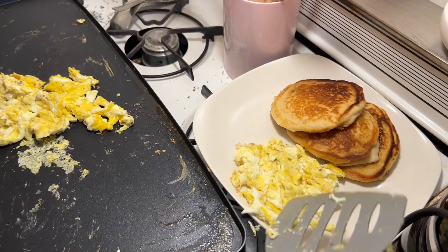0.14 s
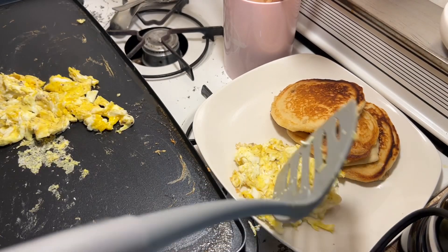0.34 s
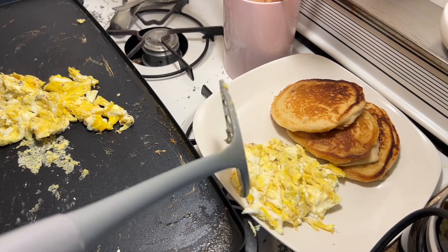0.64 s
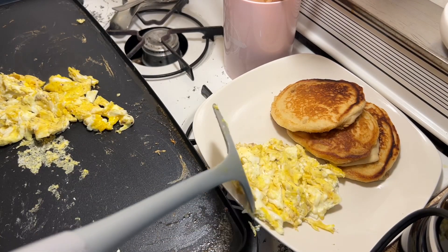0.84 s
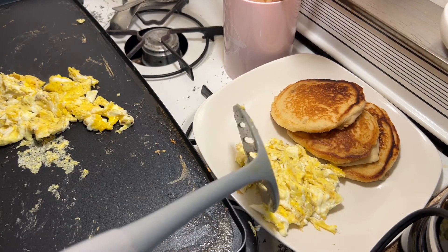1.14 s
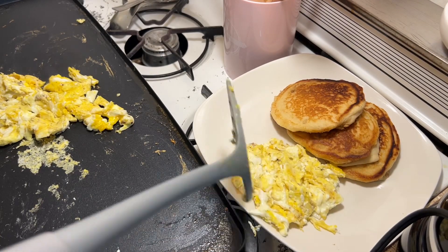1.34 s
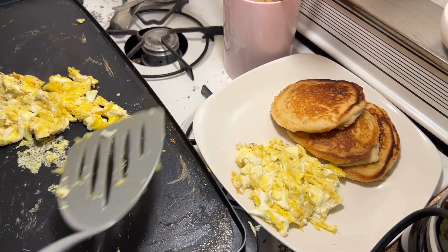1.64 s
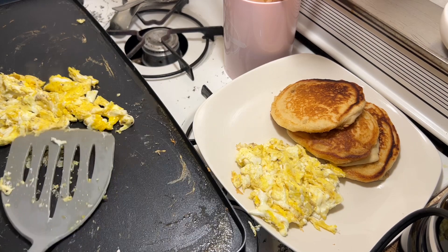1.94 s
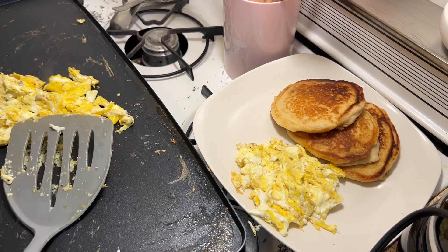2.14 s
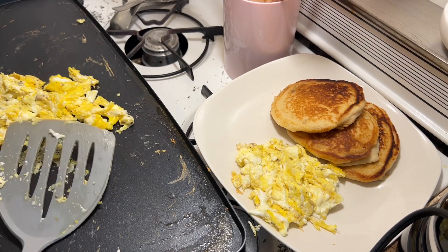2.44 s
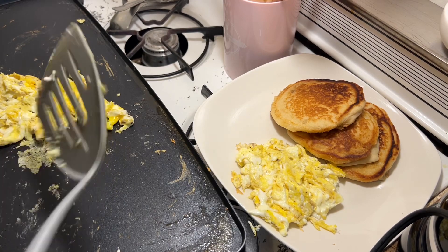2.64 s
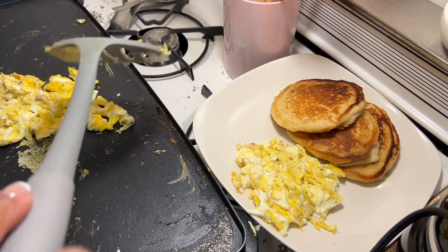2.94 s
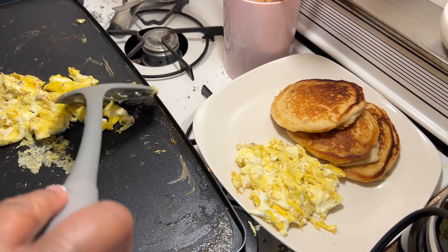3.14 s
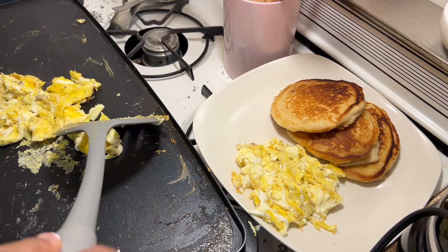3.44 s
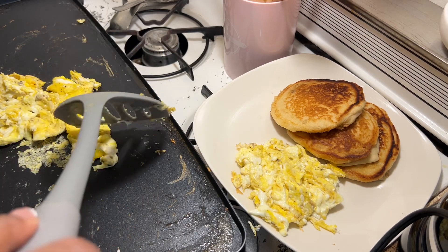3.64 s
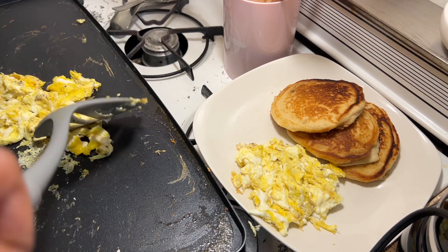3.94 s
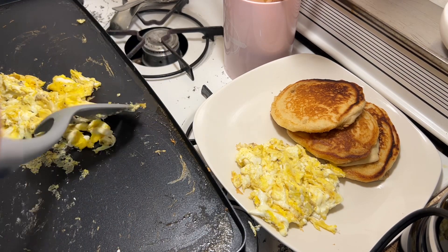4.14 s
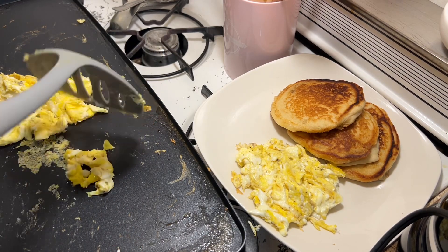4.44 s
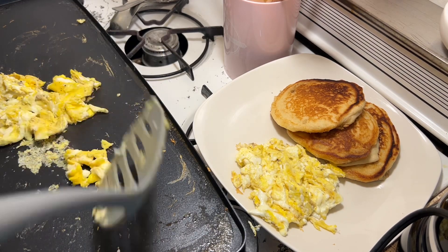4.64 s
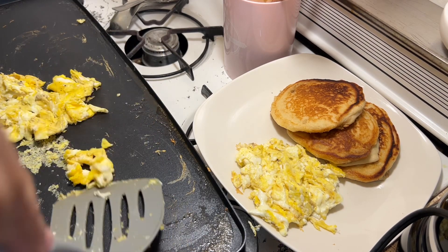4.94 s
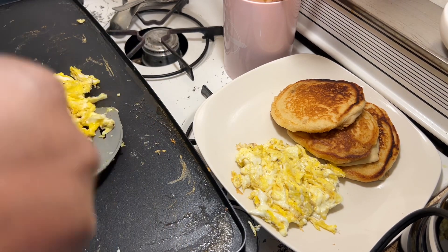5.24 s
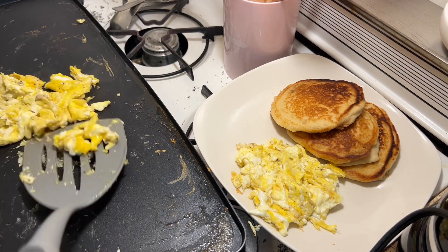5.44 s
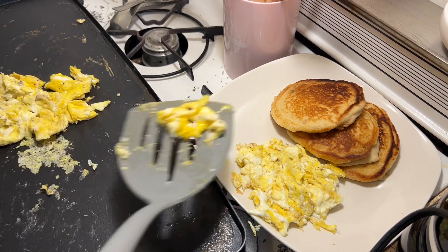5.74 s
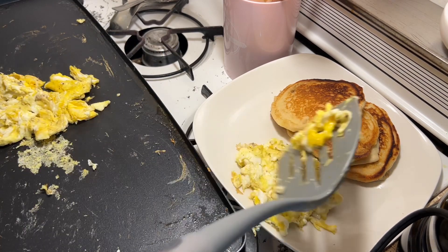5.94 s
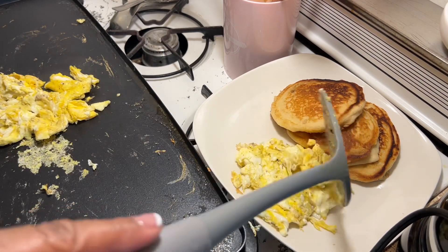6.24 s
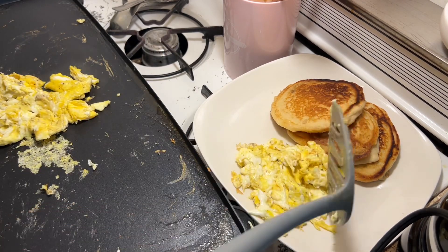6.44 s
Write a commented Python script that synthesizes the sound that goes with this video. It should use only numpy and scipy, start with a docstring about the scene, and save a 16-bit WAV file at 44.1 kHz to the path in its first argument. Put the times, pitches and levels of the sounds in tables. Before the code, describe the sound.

A plastic spatula knocks sharply on a griddle rim, taps a plate softly, then scrapes and hisses over the metal, with low hum beneath.

```python
"""In a small kitchen, close to the stove, a stereo pair of microphones hears a plastic spatula at a griddle.
It knocks the rim, slides and scrapes over the metal to gather scrambled egg, and taps it onto a plate.
Blows ring the modes of griddle and plate; slips of the blade shake the same slab and hiss over its coating.
The blade clicks, rasps on crust, whirrs as it flexes, groans when pressed and whistles on its upright edge.
A short tail from cupboards and walls follows, over a low appliance hum and faint room noise."""
import sys
import numpy as np
from scipy import signal
from scipy.fft import rfft, irfft
from scipy.io import wavfile

SR = 44100
rng = np.random.default_rng(int(sys.argv[2]) if len(sys.argv) > 2 else 0)


def dump(signal):
    """Clip the signal to [-1, 1] and save it as 16-bit WAV at the path in sys.argv[1]."""
    limited = np.clip(np.atleast_2d(signal).T, -1, 1)
    pcm = np.round(limited * 32767).astype(np.int16)
    wavfile.write(sys.argv[1], SR, pcm)


N = 290178
TIME = np.arange(N) / SR
RING_TIME = TIME[:SR // 2]


# blows and rebounds on the griddle: start_s, ring_db, click_db, contact_cutoff_hz, rim (0 flat - 1 rim)
GRIDDLE_BLOWS = [(0.0731, -14, -8, 5200, 1), (0.078, -44, -20, 4800, 1), (1.9084, -61, -19.5, 13100, 0),
                 (2.138, -60, -26, 9000, 0.079), (4.7833, -34, -20.5, 3180, 0), (4.892, -46, -37, 1200, 0),
                 (4.92, -41.5, -33, 1200, 0.16), (5.038, -56, -25, 1500, 0.1), (5.063, -58, -29, 2200, 0.1),
                 (5.145, -53, -35, 1400, 0.17)]


def griddle_taps():
    """Each blow clicks the blade and rings the slab; a softer contact excites less treble."""
    clicks, rings = np.zeros((2, 2, N))
    for start_s, ring_db, click_db, cutoff_hz, rim in GRIDDLE_BLOWS:
        add(rings, start_s, undb(ring_db) * butter(griddle_ring(rim), cutoff_hz, "low"))
        add(clicks, start_s, click(click_db, cutoff_hz))
    return clicks, rings


# vibration modes of the griddle slab: pitch_hz, t60_s, rim_level_db (struck there), flat_level_db (touched)
GRIDDLE_MODES = [(183.5, 0.16, -23.5, -11), (366, 0.21, -41, -13), (523, 0.17, -17, -16),
                 (568, 0.21, -21.5, -35), (630, 0.15, -17, -11), (675, 0.17, -23, -19.5),
                 (754, 0.12, -26, -23), (798.4, 0.13, -1, 3), (835, 0.16, -13, -21), (903, 0.1, -11.5, -12),
                 (961, 0.14, -26, -9.5), (1020, 0.11, -18, -14.5), (1150, 0.085, -7, -13),
                 (1186, 0.08, -8, -11), (1256, 0.09, -17, -11), (1333, 0.069, -19, -28),
                 (1357, 0.13, -25, -36), (1450, 0.17, -29, -31), (1514, 0.12, -25, -14),
                 (1570, 0.084, -24, -5.5), (1680, 0.076, -14, -7), (1820, 0.089, -18, -8),
                 (1895, 0.12, -25, -19), (1930, 0.081, -21, -9), (2070, 0.11, -33, -15),
                 (2267, 0.076, -19, -9.5), (2375, 0.076, -23, -7.5), (2590, 0.13, -31, -22),
                 (2838, 0.047, -18, -4.5), (2934, 0.13, -30, -22), (3236, 0.1, -21, -17),
                 (3550, 0.11, -36, -22), (3640, 0.13, -29, -21), (3800, 0.027, -3.5, -24),
                 (3970, 0.12, -35, -21), (4020, 0.021, 0, -26), (4460, 0.09, -27, -11),
                 (4600, 0.17, -35, -19), (5243, 0.08, -28, -23)]
# spectrum of the slab's crowded weak modes: pitch_hz, level_db
WASH_SPECTRUM = [(300, -16), (550, -4), (1000, 5), (2000, 2), (4200, -3), (5200, 3), (6500, -28),
                 (12000, -38)]


def griddle_ring(rim, wash_db=-18, wash_t60=0.15):
    """The slab's answer to a blow: clear modes in a wash of crowded weak ones."""
    crowd = unit(colour(stereo_noise(len(RING_TIME)), WASH_SPECTRUM))
    wash = undb(wash_db) * crowd * fade(wash_t60)
    return wash + struck(GRIDDLE_MODES, rim)


# strokes of the edge over the coating: start_s, length_s, hiss_db, top_treble_lift_db,
# crust_rasp_db, blade_whirr_db
SLIDE_STROKES = [(1.908, 0.053, -56, 4, -55.5, -54.5), (2.002, 0.048, -59.5, -8, -66, -65),
                 (2.015, 0.014, -68, -8, -55, -62), (3.201, 0.12, -58.5, 5.5, -71.5, -80),
                 (3.298, 0.094, -51, 2, -64, -79), (3.387, 0.12, -49, 3.5, -71, -71),
                 (3.513, 0.11, -56, 5, -70.5, -74), (3.777, 0.019, -63.5, 8, -87, -88),
                 (3.894, 0.063, -51.5, 6, -64, -65), (3.947, 0.049, -47, 7.5, -53.5, -54),
                 (3.976, 0.015, -60, 6, -55, -66), (4.016, 0.082, -53.5, 8.5, -74, -62.5),
                 (4.092, 0.17, -57.5, 8.5, -76, -85), (4.263, 0.13, -55, 7, -75, -65),
                 (4.851, 0.11, -60.5, 4.5, -62.5, -69), (4.963, 0.21, -58.5, 8, -78, -78),
                 (5.142, 0.15, -59.5, 5, -71, -79), (5.33, 0.078, -65, 2, -75, -80)]
# shape of a slide: attack_s, sag_db_per_s, release_t60_s
SLIDE_COURSE = (0.029, -10.5, 0.21)
# spectrum of the hiss of the edge: pitch_hz, level_db
EDGE_SPECTRUM = [(500, -38), (1200, -11), (1750, -4.5), (2400, -6.5), (3100, -3), (3800, 0), (4700, 3),
                 (5400, 2), (6000, 4), (7000, 3), (7700, 4), (8700, 3.5), (10000, -2), (12000, -12.5),
                 (15500, -9.5)]


def edge_hiss(edge_db=1, flutter_db=0.4):
    """The pebbled coating hisses under the blade's edge, brighter when the blade stands upright."""
    fine = slips(rate=3000, scatter_db=3.5)
    bursts = grains(fine * undb(flutter_db * walk(45)), t60=0.039)
    hiss = undb(edge_db) * unit(patchy(colour(bursts, EDGE_SPECTRUM)))
    sheen = colour(hiss, [(6000, -49), (8500, -10.5), (12000, 5.5), (15500, 6)])
    levels = [(start_s, length_s, db, db + lift_db)
              for start_s, length_s, db, lift_db, *_ in SLIDE_STROKES]
    gain, top_gain = gains(levels, SLIDE_COURSE)
    return gain * hiss + (top_gain - gain) * sheen


def patchy(x, depth_db=2.0, rate=90):
    """Each part of the edge catches on its own, so neighbouring bands flicker separately."""
    bins, spectrum = np.fft.rfftfreq(N, 1 / SR), rfft(x)
    centres_hz = np.geomspace(1000, 16000, 13)
    out = 0
    for band in np.eye(len(centres_hz)):
        part = irfft(spectrum * np.interp(bins, centres_hz, band), N)
        out = out + part * undb(depth_db * walk(rate))
    return out


# shoves of the flat blade under the egg: start_s, length_s, dull_rub_db, slab_judder_db,
# crust_rasp_db, blade_whirr_db
SHOVE_STROKES = [(1.925, 0.13, -53, -50, -67, -70), (2.02, 0.066, -51, -52, -63, -60.5),
                 (2.095, 0.069, -52, -61, -79, -83), (2.232, 0.073, -58, -60.5, -78, -76),
                 (2.37, 0.058, -65, -74, -83, -84), (2.42, 0.052, -50.5, -55, -67, -60),
                 (2.485, 0.056, -51, -58, -70, -82), (4.075, 0.098, -53, -60.5, -61.5, -66),
                 (4.255, 0.13, -57, -60, -60, -62), (4.88, 0.066, -61, -48.5, -67, -62),
                 (4.988, 0.023, -62, -50, -78, -55), (5.028, 0.04, -50, -65, -57.5, -64),
                 (5.112, 0.036, -60, -60, -72, -84), (5.18, 0.082, -66, -61, -72, -80)]
# shape of a shove: attack_s, sag_db_per_s, release_t60_s
SHOVE_COURSE = (0.029, -30, 0.094)
# spectrum of the dull rub: pitch_hz, level_db
RUB_SPECTRUM = [(200, -23), (320, 1), (395, 0), (480, -6), (560, -2), (655, 2), (800, -4), (900, -14.5),
                (1100, -8), (1240, -5.5), (1400, -24), (3000, -31)]
# spectrum of the dried crust: pitch_hz, level_db
CRUST_SPECTRUM = [(600, -33), (1200, 9.5), (1700, 7), (2100, 7.5), (2400, -22), (2900, 4), (7000, -37)]


def scrapes(rub_db=-2.0, judder_db=1.0, crust_db=1.0, whirr_db=0.0):
    """Coarse stick-slip thuds in the blade and shakes the slab; dried crust rasps and sets off the whirr."""
    coarse = slips(rate=1500, scatter_db=3.0)
    rub = undb(rub_db) * unit(colour(grains(coarse, t60=0.06), RUB_SPECTRUM))
    judder = undb(judder_db) * slab(butter(coarse, 1100, "low"))
    crumbs = grains(slips(rate=870, scatter_db=2.5), t60=0.0098)
    rasp = undb(crust_db) * unit(colour(crumbs, CRUST_SPECTRUM))
    bend = undb(whirr_db) * whirr(butter(crumbs, 1550, "high"))

    rub_gain, judder_gain, flat_rasp, flat_whirr = gains(SHOVE_STROKES, SHOVE_COURSE)
    edge_levels = [(start_s, length_s, *levels) for start_s, length_s, _, _, *levels in SLIDE_STROKES]
    edge_rasp, edge_whirr = gains(edge_levels, SLIDE_COURSE)
    rasp_gain = np.hypot(flat_rasp, edge_rasp)
    whirr_gain = np.hypot(flat_whirr, edge_whirr)
    return rub_gain * rub + judder_gain * judder + rasp_gain * rasp + whirr_gain * bend


def slab(releases, shift_db=3.5, rate=22):
    """The griddle rung by a travelling contact: each mode swells and fades as the blade crosses its nodes."""
    out = 0
    for hz, t60, _, flat_db in GRIDDLE_MODES:
        pole = np.exp((2j * np.pi * hz - np.log(1000) / t60) / SR)
        push = releases * undb(flat_db + shift_db * walk(rate))
        out = out + signal.lfilter([1], [1, -pole], push).imag
    return unit(out)


# pitch of the blade's lower bending resonance as it flexes: time_s, pitch_hz
WHIRR_PITCH = [(1.98, 2280), (2.07, 2300), (2.46, 2390), (3.97, 2350), (4.15, 2310), (4.36, 2285),
               (4.92, 2400)]


def whirr(releases, twin_hz=95, twin_db=-8):
    """The blade's close pair of bending resonances; their pitch shifts as the blade flexes."""
    hz = np.interp(TIME, *np.transpose(WHIRR_PITCH))
    lower = resonance(releases, hz, t60=0.04, waver=0.007, chatter_db=1.5)
    upper = resonance(releases, hz + twin_hz, t60=0.018, waver=0.015, chatter_db=1.5)
    return unit(lower + undb(twin_db) * upper)


# short groans of the pressed blade: start_s, length_s, pitch_hz, level_db
GROAN_STROKES = [(1.946, 0.068, 800, -54.5), (1.95, 0.07, 1255, -57), (2.039, 0.083, 655, -48),
                 (2.045, 0.1, 805, -55), (2.084, 0.078, 403, -52), (2.25, 0.06, 670, -59.5),
                 (2.43, 0.06, 794, -54.5), (2.48, 0.04, 417, -54), (4.095, 0.081, 747, -62),
                 (5.033, 0.045, 1237, -54), (5.111, 0.04, 690, -59), (5.184, 0.061, 790, -57.5)]
# shape of a groan: attack_s, sag_db_per_s, release_t60_s
GROAN_COURSE = (0.01, -33, 0.1)


def groans():
    """Stick-slip briefly locks onto one low resonance of the blade pressed against the slab."""
    coarse = slips(rate=1200, scatter_db=2.0)
    out = 0
    for start_s, length_s, hz, db in GROAN_STROKES:
        tone = resonance(coarse, hz, t60=0.1, waver=0.012, chatter_db=0.7)
        out = out + gains([(start_s, length_s, db)], GROAN_COURSE) * tone
    return out


# drags in which the upright edge whistles: start_s, length_s, level_db
SQUEAL_STROKES = [(3.95, 0.42, -66)]


def squeal(hz=7950):
    """A thin whistle of the upright edge as it drags: fine slips ring one high resonance."""
    whistle = resonance(slips(rate=3000, scatter_db=2.5), hz, t60=0.045, waver=0.002, chatter_db=2.5)
    return gains(SQUEAL_STROKES, SLIDE_COURSE) * whistle


# light touches on the plate: start_s, ring_db, click_db, contact_cutoff_hz, rim (0 flat - 1 rim)
PLATE_TOUCHES = [(0.8306, -48.5, -31.5, 2000, 0.97), (0.858, -52.5, -35, 1900, 1),
                 (0.896, -61.5, -48, 1800, 1), (6.23, -73, -40, 9000, 0.23),
                 (6.327, -52.5, -25.5, 10000, 0)]
# modes of the food-laden plate: pitch_hz, t60_s, rim_level_db (touched there), flat_level_db (tapped)
PLATE_MODES = [(184, 0.13, 9.5, 3), (667, 0.11, -8, -13), (880, 0.064, 3, 3), (1119, 0.077, -4, -7),
               (1500, 0.06, -3, -14), (1800, 0.028, 14, -14), (2390, 0.088, -11, -5), (2784, 0.042, -12, 7),
               (3150, 0.11, -20, -2), (3580, 0.054, -16, 3), (4021, 0.16, -20, -11), (4370, 0.045, -18, 6),
               (5250, 0.034, -22, 6.5), (8850, 0.033, -30, 14)]


def plate_taps():
    """Each touch clicks the blade and rings the plate's own modes."""
    clicks, rings = np.zeros((2, 2, N))
    for start_s, ring_db, click_db, cutoff_hz, rim in PLATE_TOUCHES:
        add(rings, start_s, undb(ring_db) * butter(struck(PLATE_MODES, rim), cutoff_hz, "low"))
        add(clicks, start_s, click(click_db, cutoff_hz))
    return clicks, rings


# spectrum of the blade's click: pitch_hz, level_db
CLICK_SPECTRUM = [(300, 3), (600, 2), (1100, 4), (1700, -2.5), (2500, 0.5), (4000, -2), (4900, -0.5),
                  (5700, -2), (8500, 3.5), (12000, -4.5), (15500, 5)]


def click(db, cutoff_hz, t60=0.047, echo_s=0.0035, echo_db=-2, size_db=-15):
    """The plastic blade's crowded, quickly damped modes, with a first echo off the back of the stove."""
    blade, echo = (unit(colour(stereo_noise(len(RING_TIME)), CLICK_SPECTRUM)) * fade(t60)
                   for _ in range(2))
    add(blade, echo_s, undb(echo_db) * echo)
    return undb(db + size_db) * butter(blade, cutoff_hz, "low", order=1)


# moments when the blade springs free: start_s, level_db
SPRING_TIMES = [(2.139, -47)]
# modes of the free blade: pitch_hz, t60_s, level_db
BLADE_MODES = [(2894, 0.038, 4), (2894, .04, 0), (4080, 0.04, -1)]


def blade_springs():
    """The blade springs free and rings in its own modes."""
    out = np.zeros((2, N))
    for start_s, db in SPRING_TIMES:
        add(out, start_s, undb(db) * ring(BLADE_MODES))
    return out


# small ticks of the blade: start_s, level_db
TICK_TIMES = [(3.247, -29), (3.567, -26), (3.579, -26), (4.456, -41), (5.402, -40), (5.466, -29.5),
              (5.609, -46)]


def blade_ticks():
    """Thin, short clicks as the blade catches on or leaves the surface."""
    out = np.zeros((2, N))
    for start_s, db in TICK_TIMES:
        tick = click(db, 16000, t60=0.019, echo_db=-13)
        add(out, start_s, butter(tick, 6000, "high", order=1))
    return out


def kitchen(x, wet_db=-11, t60=0.29, treble_t60=0.099, split_hz=2000, delay_s=0.0032):
    """A short tail from cupboards and walls, in which the treble dies first."""
    noise = rng.standard_normal((2, len(RING_TIME)))
    low = butter(noise, split_hz, "low", order=1)
    high = butter(noise - low, 4800, "low", order=1)
    onset = np.clip(RING_TIME / delay_s - 1, 0, 1)  # silent for delay_s, full after twice that
    tail = (low * fade(t60) + high * fade(treble_t60)) * onset
    return undb(wet_db) * convolve(x, tail / np.sqrt(np.sum(tail ** 2) / 2))


# tones of the hum: pitch_hz, level_db (rms, before it wavers), left_lead_radians
HUM_TONES = [(60, -58, 0), (120, -52, .25), (212.5, -60, 1.3), (240, -56, 1.2)]


def hum(waver_db=2.0):
    """Mains and motor tones of an appliance, steady in pitch, each wavering slowly in level."""
    out = 0
    for hz, db, lead in HUM_TONES:
        phase = 2 * np.pi * (hz * TIME + rng.random()) + np.array([[lead], [-lead]]) / 2
        out = out + np.sqrt(2) * undb(db + waver_db * walk(2.634)) * np.sin(phase)
    return out


# spectrum of the room noise: pitch_hz, level_db
ROOM_SPECTRUM = [(20, -22), (35, -18), (55, 1), (85, -15.5), (110, -4), (150, -14.5), (220, -13.5),
                 (300, -19), (490, -19), (800, -33), (1200, -35), (1700, -43), (5000, -46), (7000, -41.5),
                 (8600, -37.5), (10000, -46.5), (12000, -56.5), (15500, -43)]


def room_air(db=-51):
    """Steady rumble and faint hiss from filtered noise; the bass is alike on both sides."""
    mid, side = colour(rng.standard_normal((2, N)), ROOM_SPECTRUM)
    side = colour(side, [(60, -50), (110, -13.5), (200, -4.5), (700, 1.5), (8000, -3.5)])
    return undb(db) * np.array([mid + side, mid - side]) / np.std(mid)


def struck(modes, rim):
    """The ring after a blow between the flat (0) and the rim (1), blending the mode levels in dB."""
    rim = np.clip(rim, 0, 1)
    return ring([(hz, t60, rim * rim_db + (1 - rim) * flat_db) for hz, t60, rim_db, flat_db in modes])


def ring(modes, bloom_s=0.0036):
    """Sum of decaying modes; bending waves take a moment to fill the body."""
    out = 0
    for hz, t60, db in modes:
        out = out + undb(db) * fade(t60) * np.sin(2 * np.pi * (hz * RING_TIME + rng.random()))
    return out[None] * (1 - np.exp(-RING_TIME / bloom_s))


def slips(rate, scatter_db):
    """Random stick-slip releases of uneven size and either sign, on average rate a second."""
    size = undb(scatter_db * np.clip(rng.standard_normal(N), -2, 2)) * rng.choice([-1, 1], N)
    return size * (rng.random(N) < rate / SR)


def grains(releases, t60):
    """Every release sets off its own brief noise burst, scattered by the stove top."""
    power = convolve(releases ** 2, fade(t60)[None] ** 2)
    return unit(np.sqrt(np.abs(power)) * stereo_noise(N))


def resonance(releases, hz, t60, waver, chatter_db):
    """One resonance rung by uneven bunches of slips; its pitch wavers with the pressure."""
    turn = np.exp(2j * np.pi * np.cumsum(hz * (1 + waver * walk(60))) / SR)
    pole = np.exp(-np.log(1000) / (t60 * SR))
    push = releases * undb(chatter_db * walk(70))
    # ring at zero pitch, then turn up to the moving pitch
    return unit((signal.lfilter([1], [1, -pole], push / turn) * turn).real)


def gains(strokes, shape):
    """One gain curve per dB column: a stroke bites, eases off as the hand slows, and dies away."""
    attack_s, sag_db_per_s, release_t60 = shape
    power = 0
    for start_s, length_s, *levels in strokes:
        age = np.maximum(TIME - start_s, 0)
        attack = np.minimum(age / attack_s, 1)
        sag = undb(sag_db_per_s * np.minimum(age, length_s))
        release = np.exp(-np.log(1000) * np.maximum(age - length_s, 0) / release_t60)
        power = power + np.outer(undb(levels), attack * sag * release) ** 2
    return np.sqrt(power)


def stereo_noise(size, direct=0.86):
    """Two noises that share a direct part."""
    left, right, shared = rng.standard_normal((3, size))
    return np.array([left, right]) + direct * shared


def walk(rate):
    """Smooth random drift with a spread near 1, through rate random points a second."""
    knots = rng.standard_normal(int(N / SR * rate) + 2)
    return np.interp(TIME * rate, np.arange(len(knots)), knots)


def fade(t60):
    """Exponential decay, 60 dB down after t60 seconds."""
    return np.exp(-np.log(1000) * RING_TIME / t60)


def undb(db):
    """Decibels to gain."""
    return 10 ** (np.asarray(db) / 20)


def unit(x):
    """Scale to rms 1."""
    return x / np.sqrt(np.mean(x ** 2))


def pan(db):
    """Left and right gains for a level difference."""
    return undb(np.array([[db], [-db]]) / 2)


def colour(x, points):
    """Filter by a spectrum of (pitch_hz, level_db) points."""
    hz, db = np.transpose(points)
    bins = np.maximum(np.fft.rfftfreq(x.shape[-1], 1 / SR), 1)
    response = undb(np.interp(np.log(bins), np.log(hz), db))
    return irfft(rfft(x) * response, x.shape[-1])


def butter(x, hz, kind, order=2):
    """Low-pass or high-pass."""
    sos = signal.butter(order, min(hz, SR / 2 - 1000), kind, fs=SR, output="sos")
    return signal.sosfilt(sos, x)


def convolve(x, response):
    """Pass a sound through a response of one or two channels."""
    return signal.fftconvolve(np.atleast_2d(x), response, axes=1)[:, :N]


def add(out, start_s, sound):
    """Mix a sound in at a time."""
    start = int(start_s * SR)
    out[:, start:start + sound.shape[1]] += sound[:, :out.shape[1] - start]


def scene(ring_room_db=-7):
    """Rings of griddle and plate are kept drier than the blade's noises and lean slightly left."""
    griddle_clicks, griddle_rings = griddle_taps()
    plate_clicks, plate_rings = plate_taps()
    clicks = griddle_clicks + plate_clicks + blade_springs() + blade_ticks()
    rings = griddle_rings + plate_rings
    blade = clicks + scrapes() + groans() + edge_hiss() + squeal()
    reflected = kitchen(blade + undb(ring_room_db) * rings)
    return blade + rings * pan(1.0) + reflected + hum() + room_air()


# how far the left microphone leads the right: pitch_hz, lead_radians
MIC_LEAD = [(250, 0), (520, .6), (780, -.6), (1000, .2), (1250, -1), (1750, 2.8), (2000, 2), (2200, -.8),
            (2700, .5), (3000, 2.6), (3300, 0), (5300, .3), (5700, 1.4), (6700, .2), (7100, 2.5), (8000, 0)]
# phase turn by which the recorder spreads the shared treble: pitch_hz, turn_radians
TREBLE_TURN = [(8700, -.4), (9800, -3.1), (10600, -3.3), (11500, -6.2), (12700, -6.6), (13200, -9.4),
               (14200, -9.6), (15100, -12.5)]
# how much more the left microphone hears than the right: pitch_hz, level_db
MIC_LEAN = [(60, 0), (200, -1.5), (380, 2), (800, 1), (1200, 3), (2400, 4.5), (3500, 4), (5000, 2.5),
            (7400, 5), (8300, -2.5), (15000, 1.5)]
# where the recorder cuts the top: cutoff_hz
TOP_CUTOFF_HZ = 15900


def record(dry):
    """The sides differ in level and phase; the recorder shares most treble, spreads it and cuts the top."""
    bins = np.fft.rfftfreq(N, 1 / SR)
    left, right = rfft(dry)
    share = np.interp(bins, (7600, 8400), [0, 0.9])  # the right side takes on the left's treble
    right = right + share * (left - right)
    turn = np.exp(.5j * np.interp(bins, *np.transpose(MIC_LEAD + TREBLE_TURN)))  # half to each side
    sides = irfft(np.array([left * turn, right / turn]), N)
    leaning = [colour(x, [(hz, sign * db / 2) for hz, db in MIC_LEAN])
               for x, sign in zip(sides, (1, -1))]
    return signal.sosfilt(signal.ellip(10, .2, 80, TOP_CUTOFF_HZ, fs=SR, output="sos"), leaning)


dry = scene()
out = record(dry)
dump(out)
```